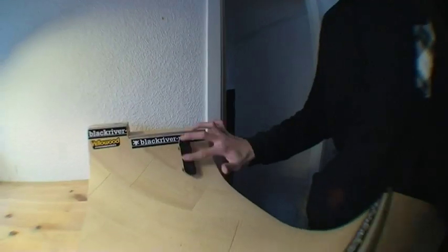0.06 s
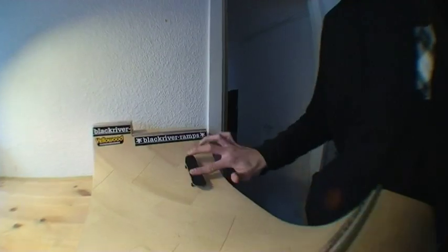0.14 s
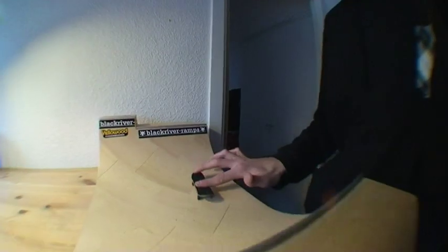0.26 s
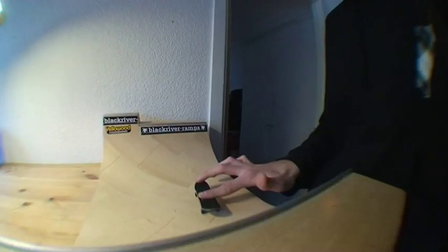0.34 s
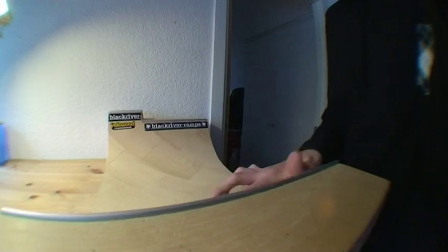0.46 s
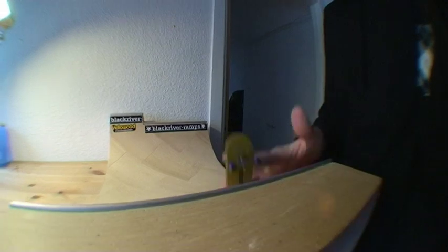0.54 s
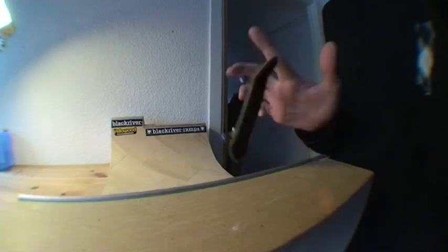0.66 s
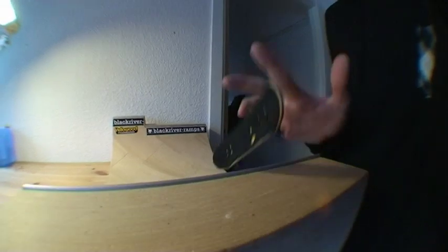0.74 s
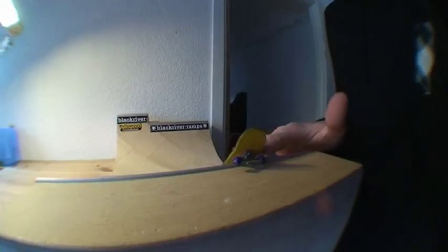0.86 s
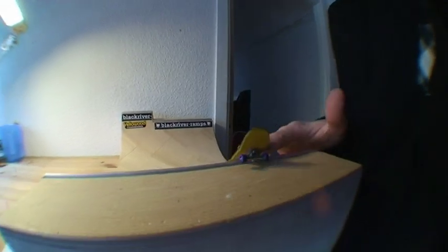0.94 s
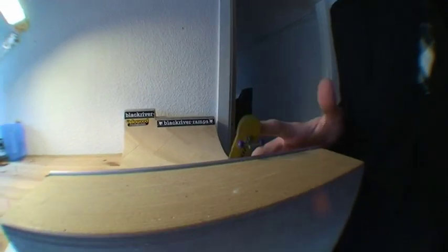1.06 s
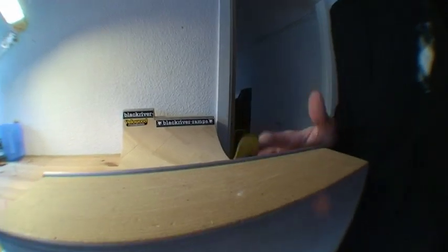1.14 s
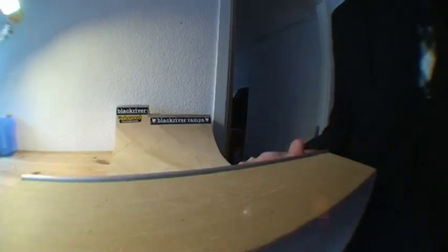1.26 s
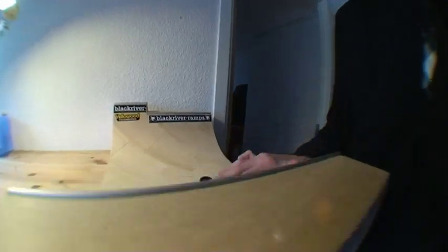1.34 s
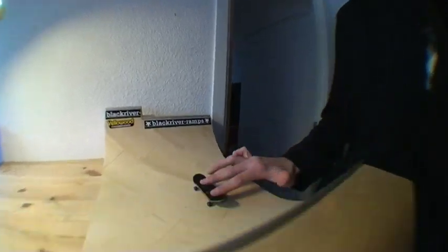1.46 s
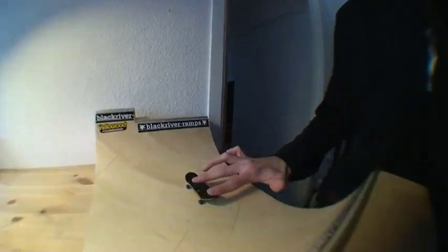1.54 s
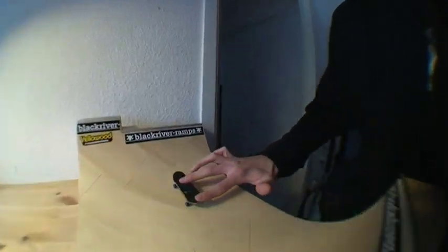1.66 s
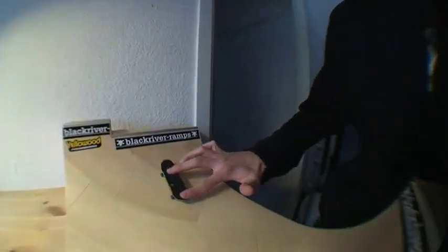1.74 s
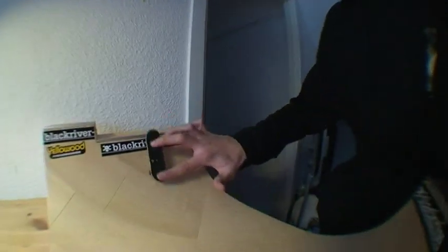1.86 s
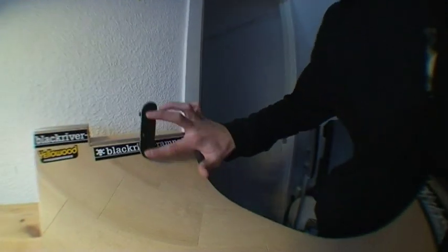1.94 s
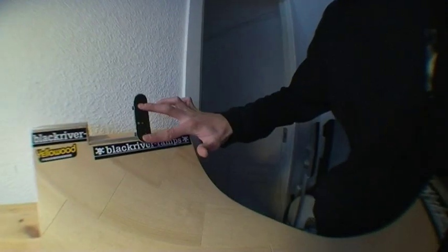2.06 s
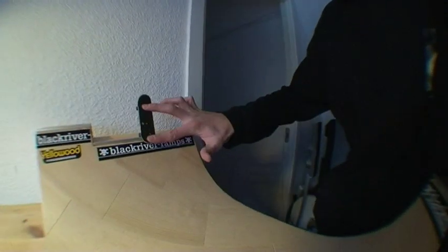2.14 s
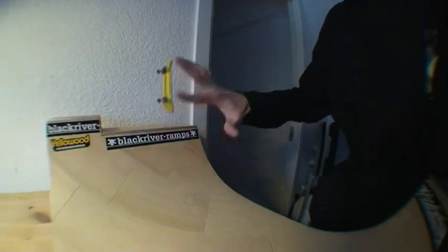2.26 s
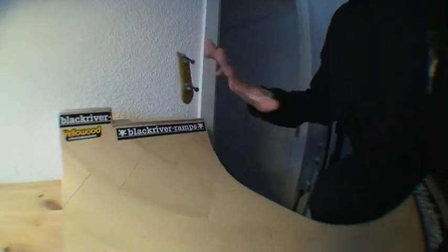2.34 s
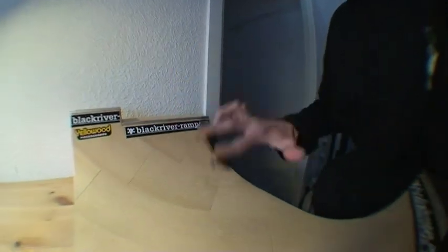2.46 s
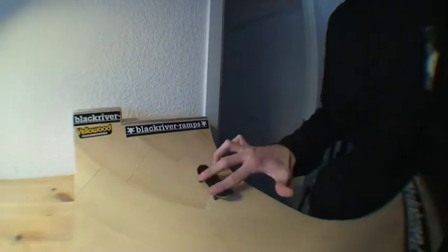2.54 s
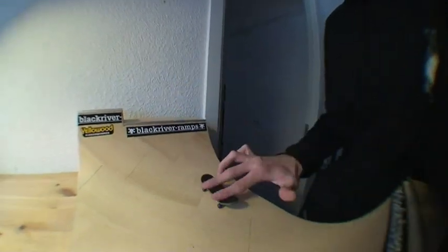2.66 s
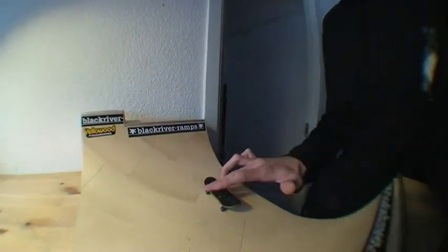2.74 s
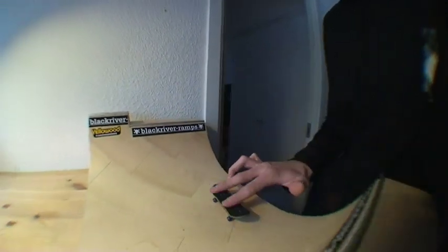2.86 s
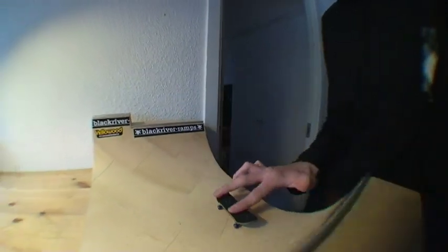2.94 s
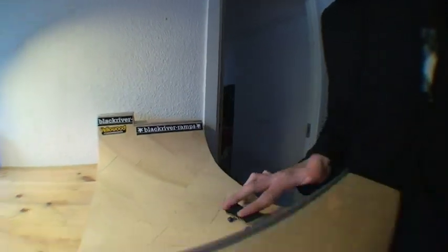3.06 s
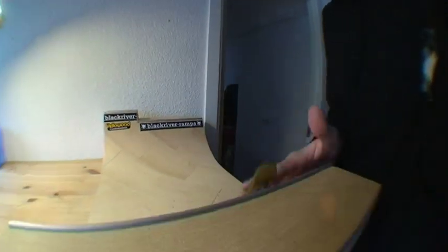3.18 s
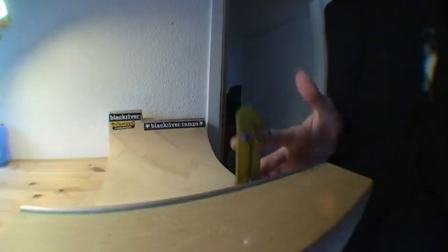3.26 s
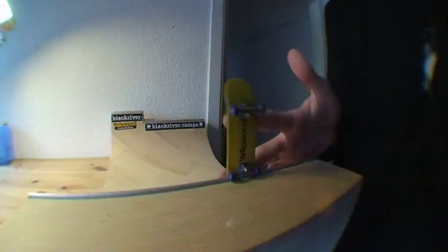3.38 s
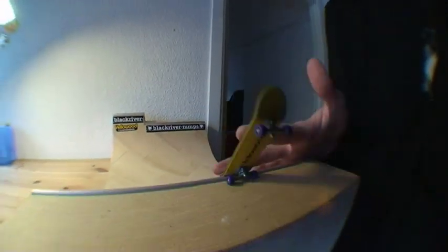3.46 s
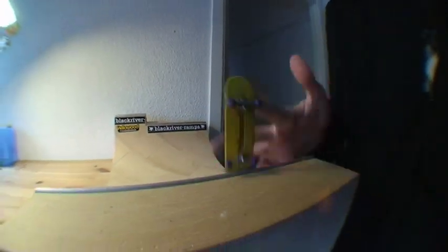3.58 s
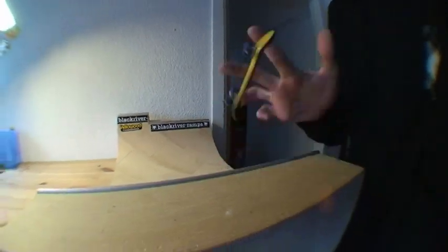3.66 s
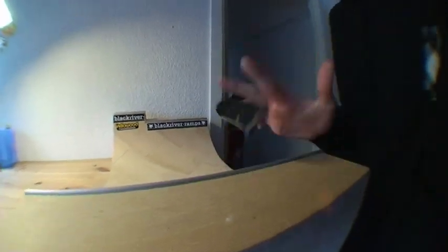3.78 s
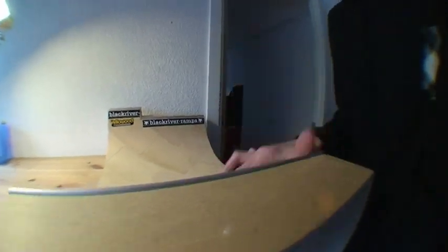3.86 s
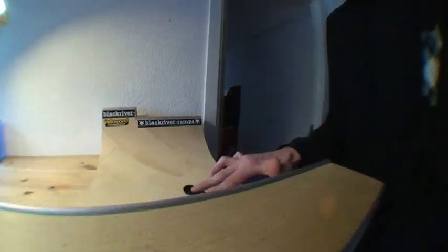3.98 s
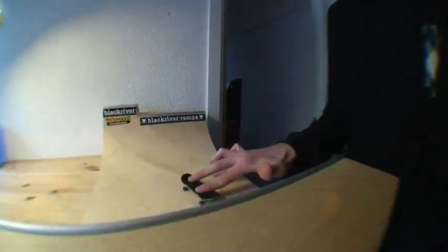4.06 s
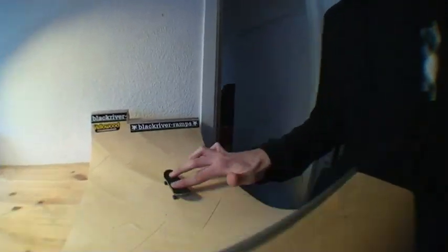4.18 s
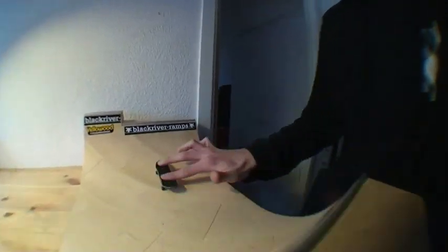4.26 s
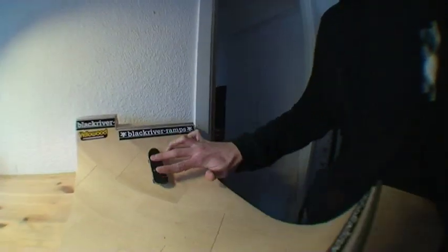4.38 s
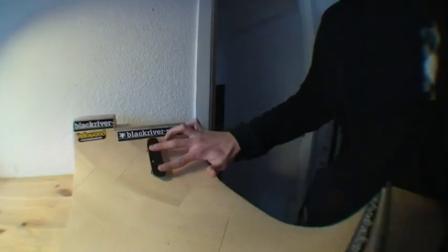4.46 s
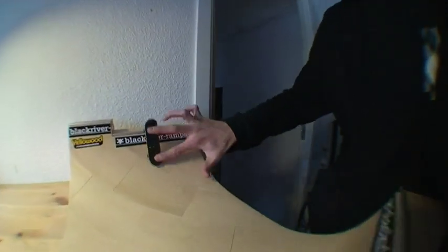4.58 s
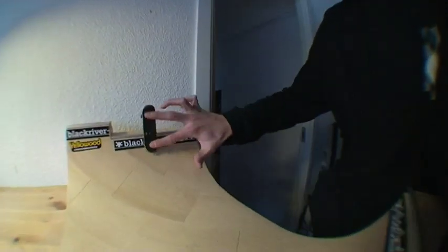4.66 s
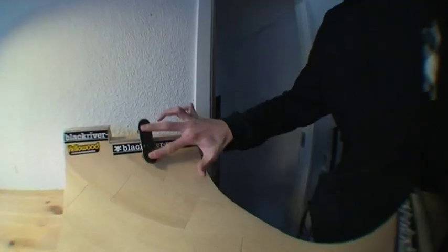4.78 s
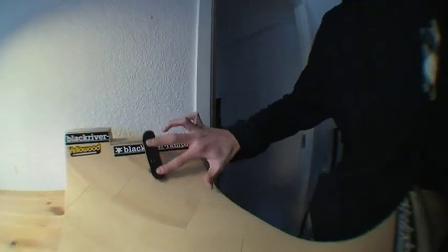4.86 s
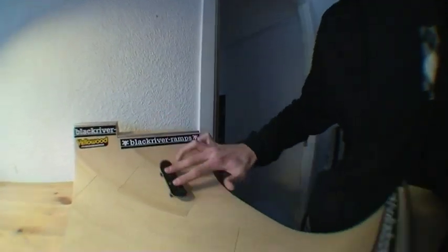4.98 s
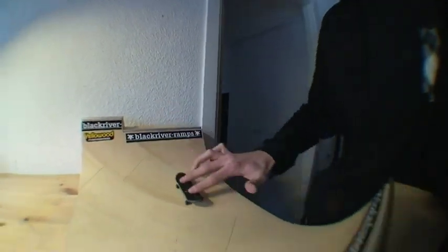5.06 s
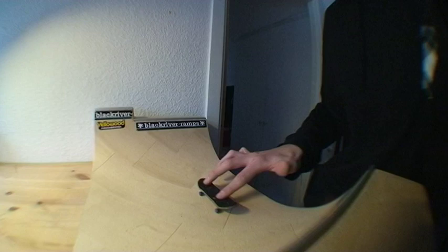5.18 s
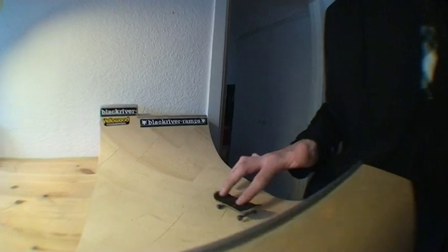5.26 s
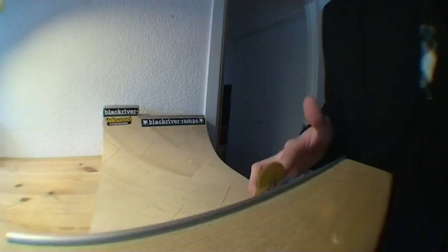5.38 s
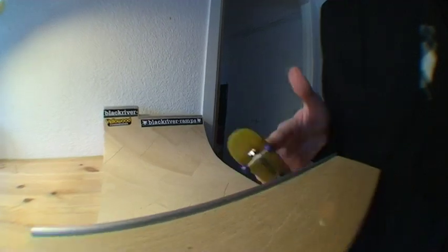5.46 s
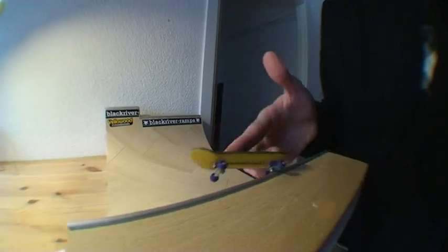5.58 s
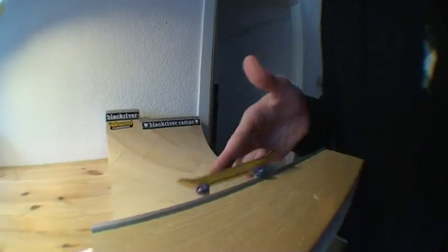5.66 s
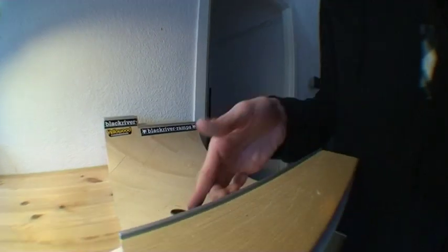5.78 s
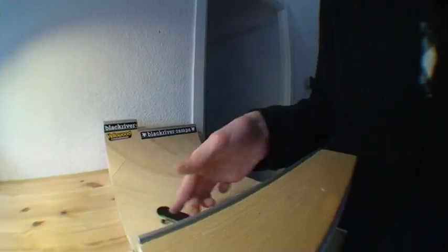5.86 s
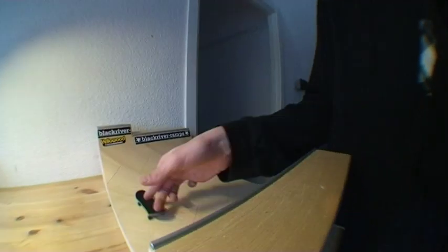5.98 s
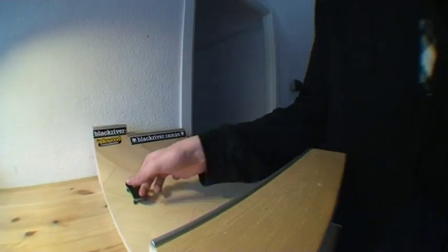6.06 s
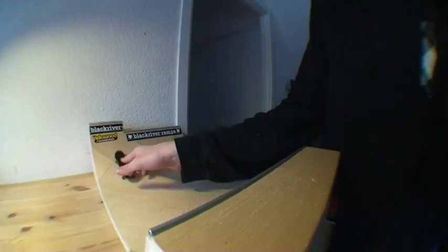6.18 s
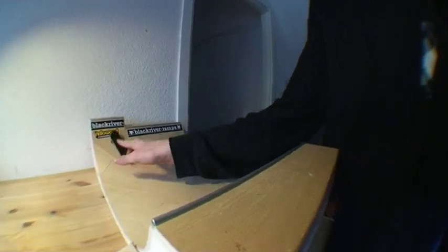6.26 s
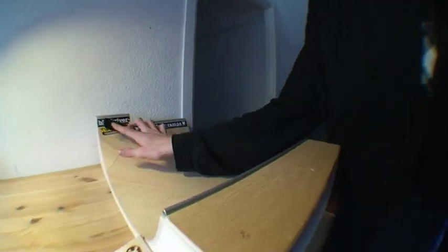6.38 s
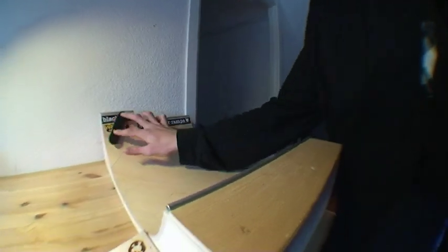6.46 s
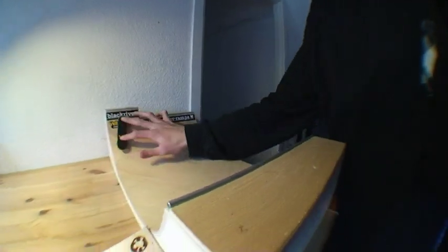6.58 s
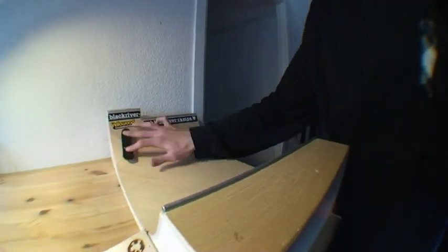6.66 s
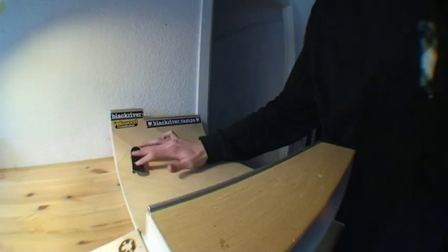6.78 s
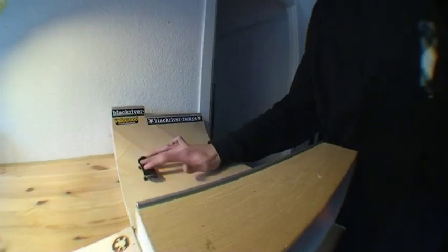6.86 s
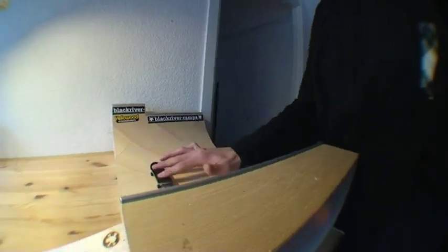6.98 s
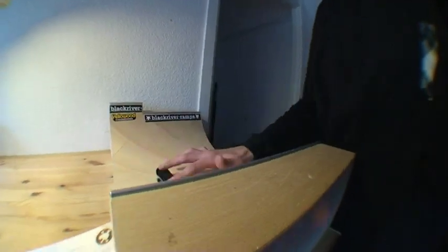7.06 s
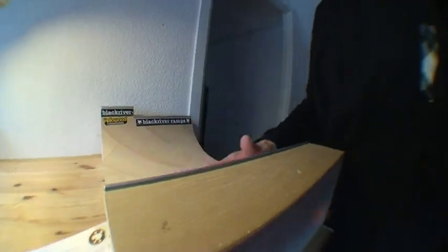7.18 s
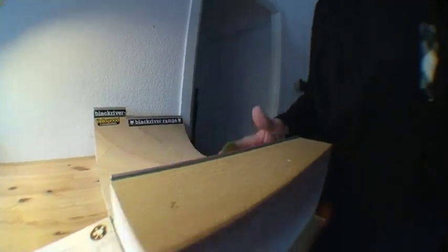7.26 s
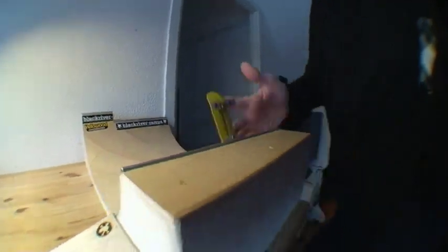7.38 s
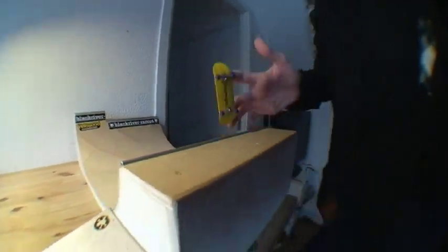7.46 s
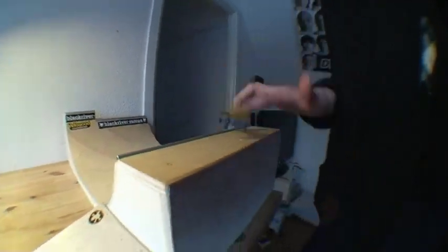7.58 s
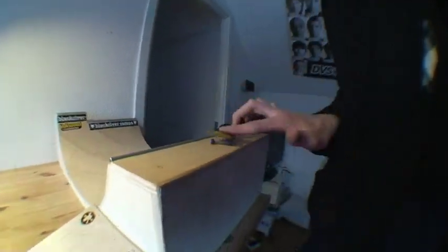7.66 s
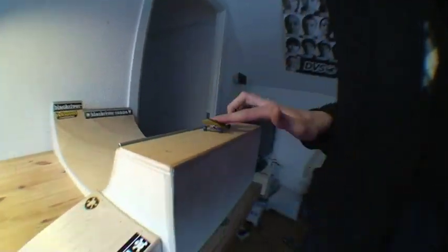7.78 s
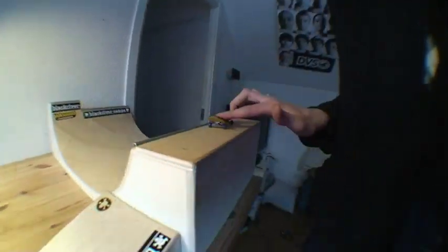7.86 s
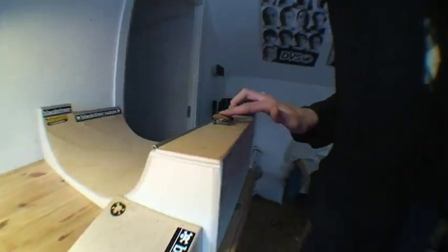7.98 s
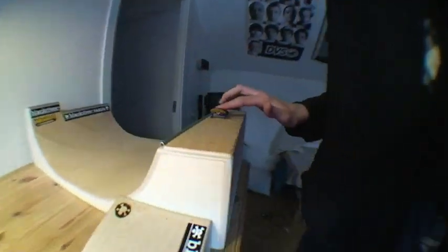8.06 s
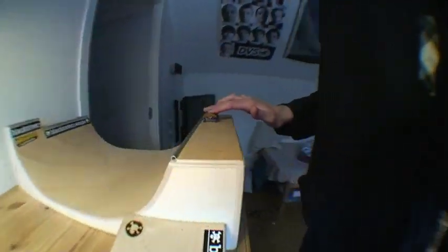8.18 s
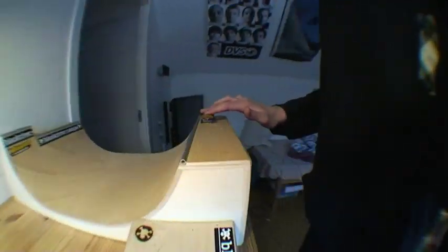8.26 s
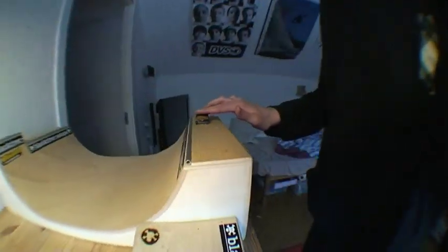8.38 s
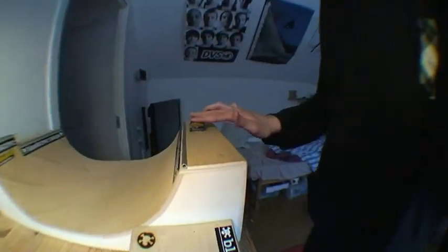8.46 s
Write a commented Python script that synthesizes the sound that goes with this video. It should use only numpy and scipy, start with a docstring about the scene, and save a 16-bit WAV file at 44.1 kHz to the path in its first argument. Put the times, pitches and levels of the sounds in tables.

```python
"""Hard little wheels of a toy finger skateboard rumble over a hollow plywood ramp on a desk, close to a camera.
Grain bumps and rubbing noise drive wandering ramp and deck resonances; the wheels add bright grit.
Pops, landings and knocks are chatters of contacts that ring ramp, deck and metal; axles tick, wheels skid
and a metal edge rings under a scrape. Close reflections and a small room answer, over grip rumble,
sleeve rustle, hiss and faint tones; sharp blows overload the microphone input."""
import sys
import numpy as np
from scipy import signal
from scipy.fft import rfft, irfft, next_fast_len
from scipy.io import wavfile

SR = 44100
rng = np.random.default_rng(int(sys.argv[2]) if len(sys.argv) > 2 else 0)


def how_loud(loudness_db):
    """Turn decibels into a plain amplitude multiplier (0 dB gives 1, 20 dB gives 10)."""
    steps = np.asarray(loudness_db, float) / 20
    return 10 ** steps


def file_out(sig):
    """Save sig as 16-bit WAV at sys.argv[1]."""
    # one column per channel
    cols = np.atleast_2d(sig).T
    # limit, then scale
    lim = np.clip(cols, -1, 1)
    pcm = np.round(lim * 32767).astype(np.int16)
    wavfile.write(sys.argv[1], SR, pcm)


N = 376173


def rms_one(x):
    """Scale to rms 1."""
    return x / np.sqrt(np.mean(x ** 2) + 1e-20)


def in_time(rows):
    """Table columns joined by lines over the first column (s), one value a sample."""
    time_s, *columns = np.transpose(rows)
    return np.array([np.interp(np.arange(N) / SR, time_s, column) for column in columns])


def band(x, low_hz, high_hz):
    """Band-pass."""
    sos = signal.butter(2, [low_hz, min(high_hz, .45 * SR)], "band", fs=SR, output="sos")
    return signal.sosfilt(sos, x)


def coloured(x, spectrum):
    """Give a flat signal the colour of a (Hz, dB) table, joined over log frequency."""
    size = next_fast_len(N)
    hz, level_db = np.transpose(spectrum)
    log_hz = np.log(np.arange(1, size // 2 + 2) * SR / size)
    gain = how_loud(np.interp(log_hz, np.log(hz), level_db))
    return irfft(rfft(x, size) * gain, size)[..., :N]


def drift(rate_hz):
    """Slow random curve of rms 1: noise at SR / 40 through a double pole."""
    r = np.exp(-80 * np.pi * rate_hz / SR)
    noise = rng.standard_normal(N // 40 + 2002)
    slow = signal.lfilter([1], [1, -2 * r, r * r], noise)[2000:]
    return np.interp(np.arange(N) / 40, np.arange(len(slow)), rms_one(slow))


def decay_per_sample(t60_s):
    """Pole radius that loses 60 dB in t60_s, at least 3 ms."""
    return how_loud(-60 / (max(t60_s, .003) * SR))


def ring(push, hz, t60_s):
    """Fixed resonance: a unit click sets a sine of height 1 ringing."""
    r, w = decay_per_sample(t60_s), 2 * np.pi * hz / SR
    return signal.lfilter([0, np.sin(w)], [1, -2 * r * np.cos(w), r * r], push + 1e-18)


def sliding(push, hz, t60_s):
    """Resonance of moving pitch: turn down to rest, smooth, turn back."""
    turn = np.exp(2j * np.pi * np.cumsum(hz) / SR)
    smooth = signal.lfilter([1], [1, -decay_per_sample(t60_s)], push / turn)
    return rms_one((smooth * turn).real)


# room hiss spectrum: pitch_hz, level_db_per_hz
AIR_SPECTRUM = [(30, -10), (520, -9), (700, -17), (5200, -28), (6300, -21), (8900, -28), (9600, -33),
                (16000, -39)]
# faint steady room tones: pitch_hz, rms_db
ROOM_TONES = [(516.8, -73.5), (1200, -82), (1927, -80), (2815, -81)]


def room_tone():
    """Coloured hiss, partly shared by the channels, with noise-driven narrow resonances that waver."""
    hiss_rms_db = -67
    noise = rng.standard_normal((3, N))
    hiss = rms_one(coloured(noise[0] + .5 * noise[1:], AIR_SPECTRUM))
    tones = sum(how_loud(rms_db) * rms_one(ring(noise[1], hz, t60_s=1.0)) for hz, rms_db in ROOM_TONES)
    return how_loud(hiss_rms_db) * hiss + tones


# sleeve rustle as the camera swings: time_s, level_db
RUSTLE_LEVEL = [(7.3, -76.5), (7.5, -62), (7.95, -62), (8.53, -51)]


def sleeve_rustle():
    """Cloth friction: mid-band noise of uneven level."""
    noise = rms_one(band(rng.standard_normal((2, N)), 220, 3200))
    return how_loud(in_time(RUSTLE_LEVEL)[0] + 5.2 * drift(32)) * noise


# the hand shifts on the camera: time_s, level_db
GRIP_LEVEL = [(5.85, -73), (6.15, -62), (6.5, -74), (6.9, -53.5), (7.2, -62), (7.5, -44), (7.9, -68),
              (8.05, -53.5), (8.3, -46), (8.53, -62)]


def grip():
    """Dull lumpy rumble through the camera body: low noise of uneven level."""
    noise = rms_one(band(rng.standard_normal((2, N)), 66, 300))
    return how_loud(in_time(GRIP_LEVEL)[0] + 7.2 * drift(18)) * noise


def room(x):
    """Dense reflections, unlike in the two channels: a low and a high noise tail, each with its own decay."""
    level_db, low_t60_s, high_t60_s, build_up_s = -12.5, 0.31, 0.39, 0.0036
    t = np.arange(SR // 2) / SR
    noise = rng.standard_normal((3, len(t)))
    tail = band(noise[0] + 0.49 * noise[1:], 51, 2600) * how_loud(-60 * t / low_t60_s)
    tail += band(noise[0] + 2.6 * noise[1:], 1200, 11000) * how_loud(-60 * t / high_t60_s - 15.5)
    tail = tail * np.minimum(t / build_up_s, 1)
    tail = tail / np.sqrt(np.sum(tail ** 2) / 2)
    return how_loud(level_db) * signal.fftconvolve(x[None], tail, axes=1)[:, :N]


def near(x):
    """Close reflections off desk and camera: opposite sign in the channels widens the treble."""
    level_db, fade_s = -15, .014
    t = np.arange(4096) / SR
    echo = band(rng.standard_normal(len(t)) * np.exp(-t / fade_s), 1200, 10500)
    return how_loud(level_db) * signal.fftconvolve(x, echo / np.linalg.norm(echo))[:N] * [[1], [-1]]


# ringing metal edge: pitch_hz, level_db (relative), t60_s
RAIL_MODES = [(3040, -12, 0.52), (3130, -1.5, 0.26), (3700, 7, 0.092)]


def rail():
    """The axle scrapes off the metal edge: noise-driven rough rings, each dying at its own rate."""
    start_s, level_db = 5.579, -34
    since_s = np.arange(N) / SR - start_s
    noise = rng.standard_normal(N)
    out = np.zeros(N)
    for hz, mode_db, t60_s in RAIL_MODES:
        fade = (since_s > 0) * how_loud(level_db + mode_db - 60 * np.abs(since_s) / t60_s)
        out += fade * rms_one(ring(noise, hz, t60_s=0.014))
    return out


# wheels skid up the slope: time_s, level_db, centre_hz
SKID_PATH = [(1.7, -77.5, 9880), (1.84, -37.5, 8800), (1.97, -46, 6600), (2.02, -80, 6040)]


def skid():
    """Narrow hiss with a falling centre: low noise times a sliding sine."""
    level_db, hz = in_time(SKID_PATH)
    noise = band(rng.standard_normal(N), 20, 650)
    return how_loud(level_db) * rms_one(noise * np.sin(2 * np.pi * np.cumsum(hz) / SR))


# loose axles and wheels tick: start_s, peak_db, pitch_hz
TICK_EVENTS = [(0.871, -14, 5400), (2.826, -24, 3580), (2.919, -26, 5030), (3.374, -24, 5000),
               (3.616, -35.5, 5250), (4.566, -12.5, 3460), (5.104, -21, 6500), (6.4565, -23.5, 4860),
               (6.553, -21, 5530), (6.634, -32, 5810), (6.649, -28, 5500), (8.4658, -30, 3660)]


def ticks():
    """Brief bright noise bursts, each in its own band; a random rattle follows the wheel grit."""
    t60_s, typical_rattles_per_s, rattle_over_grit_db = 0.019, 55, -13
    out, t = np.zeros(N), np.arange(1024) / SR
    for (start_s, peak_db, hz), noise in zip(TICK_EVENTS, rng.standard_normal((len(TICK_EVENTS), len(t)))):
        burst = band(noise * how_loud(-60 * t / t60_s), 0.5 * hz, 1.33 * hz)
        out[int(start_s * SR):][:len(t)] += how_loud(peak_db) * burst / np.abs(burst).max()

    met = rng.random(N) < typical_rattles_per_s * how_loud(5.0 * drift(4)) / SR
    met = met * how_loud(1.8 * np.minimum(rng.exponential(1, N), 3))
    dealt, noise = rng.integers(0, 6, N), rng.standard_normal(N)    # each rattle falls in one of six bands
    rattle = 0
    for k, hz in enumerate(np.geomspace(3000, 11000, 6)):
        fading = signal.lfilter([1], [1, -decay_per_sample(t60_s)], met * (dealt == k) + 1e-18)
        rattle = rattle + how_loud(-5 * k) * band(noise * fading, .8 * hz, 1.25 * hz)
    grit_db = ride()[1]
    return out + how_loud(grit_db + rattle_over_grit_db) * rms_one(rattle)


def input_overload():
    """Sharp blows overload the input, which clips unevenly: a one-sided low offset that settles slowly."""
    start_s, _, _, metal_drive_db, _ = np.transpose(BLOW_EVENTS)
    offsets = np.zeros(N)
    offsets[np.round(start_s * SR).astype(int)] = np.tanh(how_loud(metal_drive_db + 13.5) ** 2)  # saturates
    settle = signal.lfilter([1], [1, -np.exp(-1 / (0.053 * SR))], offsets)
    return how_loud(-31.5) * band(band(settle, 3.3, 50), 1.3, 60)


def struck(start_s, drive_db, chatter_ms, low_hz, high_hz, crack_db, modes=(), modes_db=0):
    """Each blow is a short chatter of contacts: a crack, plus modes with new strengths each time."""
    t = np.arange(4096) / SR
    count = len(start_s)
    chatter_s = np.clip(chatter_ms, .3, 25)[:, None] / 1000
    fade = np.exp(-(t / chatter_s) ** 0.78)
    chatter = fade * rng.standard_normal((count, len(t)))
    # chance shapes a blow but leaves its strength
    evened = np.linalg.norm(fade, axis=1) / np.linalg.norm(band(chatter, low_hz, high_hz), axis=1)
    evened = evened * np.sqrt(2 * (high_hz - low_hz) / SR)
    chatter = chatter * (how_loud(drive_db) * evened)[:, None]
    at = np.round(start_s * SR).astype(int)[:, None] + np.arange(len(t))

    def laid(rows):
        """Add one row per blow into the timeline."""
        return np.bincount(at.ravel(), rows.ravel(), N)

    out = how_loud(crack_db) * band(band(laid(chatter), low_hz, high_hz), .5 * low_hz, 2 * high_hz)
    softened = chatter / np.sqrt(chatter_s * SR)     # a longer chatter is many weaker contacts
    strengths = how_loud(2.5 * rng.standard_normal((count, len(modes))))
    for k, (hz, mode_db, t60_s) in enumerate(modes):
        out += ring(laid(softened * strengths[:, [k]]) * how_loud(mode_db + modes_db), hz, t60_s)
    return out


# blows: start_s, deck_drive_db, ramp_drive_db, metal_drive_db, chatter_ms
BLOW_EVENTS = [(0.1118, -2.5, -5, -14, 2.8), (0.83, -3, -29, -23, 2.5), (0.8486, -3.5, -21, -14.5, 2.4),
               (0.8781, -7, -17, -15.5, 4.9), (1.0597, -38, -40, -51, 5.6), (1.092, -32, -36, -51, 12),
               (1.2077, -9, -28, -19, 4.2), (1.9873, -14.5, -12, -32, 4.2),
               (2.0315, -17.5, -15, -19.5, 9.4), (2.0813, -5.5, -14, -17, 5.8), (2.5594, -6, -7, -20, 16.4),
               (2.567, -14, -8.5, -18, 21.4), (3.36, -62, -27, -21, 4.8), (3.438, -19, -61, -18, 3.7),
               (3.447, -4.5, -22.5, -17, 1.26), (3.4884, -35, -29, -35, 7.3), (3.68, -83, -37, -50, 2),
               (3.881, -14, -16.5, -8.5, 1.65), (3.903, -7.5, -23, -28, 8.2), (3.914, -6, -18.5, -25, 16.6),
               (4.3744, -9, -11.5, -25.5, 2.2), (4.5212, -17.5, -21, -26, 1.1),
               (4.784, -1.5, -20.5, -14, 1.5), (4.7994, -12, -28, -20.5, 3.1), (4.958, -3, -42, -18, 3.1),
               (5.5513, -44, -49, -17, 3.8), (5.5789, -13.5, -57, -19, 2.9), (5.743, -23, -30, -26.5, 9),
               (5.777, -8.5, -20, -60, 3.9), (6.5328, -7.5, -18, -24, 2.7),  (7.6594, -7, -17.5, -19, 1),
               (7.6654, -5.5, -33, -16, 7), (7.674, -17, -29, -32, 34)]
# hollow ramp modes, also rung by rolling: pitch_hz, level_db (relative), t60_s
RAMP_MODES = [(332.3, 4, 0.18), (462.5, 10, 0.052), (663, 2, 0.11), (838, 1.5, 0.12), (1149, 2.5, 0.11)]
# thin deck modes, also rung by rolling: pitch_hz, level_db (relative), t60_s
DECK_MODES = [(1409, -8, 0.068), (1713, 3.5, 0.023), (2138, 1.5, 0.017), (2904, -10, 0.05),
              (4180, -17.5, 0.048)]


def blows():
    """Hollow ramp and thin deck ring; the metal parts give a shorter, dry tick."""
    start_s, deck_db, ramp_db, metal_db, chatter_ms = np.transpose(BLOW_EVENTS)
    ramp = struck(start_s, ramp_db, chatter_ms, 280, 1000, crack_db=10.0, modes=RAMP_MODES, modes_db=-19.0)
    deck = struck(start_s, deck_db, chatter_ms, 880, 3160, crack_db=3.0, modes=DECK_MODES, modes_db=-11.0)
    metal = struck(start_s, metal_db, 0.24 * chatter_ms, 3500, 8180, crack_db=13.0)
    return ramp + deck + metal


# wheels on the wood: contact_s, lift_s, contact_rumble_db, lift_rumble_db, grit_db (where rumble is -30 dB)
ROLL_STRETCHES = [(0.092, 0.592, -32, -30, -37), (1.25, 1.974, -36, -27, -40),
                  (2.652, 3.307, -38.5, -22.5, -39), (3.956, 4.006, -25.5, -36, -38.5),
                  (4.119, 4.691, -27.5, -26, -41.5), (4.78, 4.775, -35, -21, -44),
                  (4.918, 4.942, -30, -24.5, -43.5), (5.039, 5.521, -23.5, -23, -41.5),
                  (5.694, 5.89, -46, -52, -22), (5.913, 6.375, -31.5, -28, -32),
                  (6.435, 6.6, -38.5, -58, -31.5), (6.662, 7.394, -32.5, -26, -40.5),
                  (8.037, 8.34, -47.5, -42.5, -35), (8.512, 8.544, -38, -24.5, -32.5)]
# finger pressure changes: centre_s, width_s, rumble_gain_db, extra_grit_db
FINGER_PRESSES = [(0.295, 0.062, 8.5, -4), (0.501, 0.11, 6.5, 2.5), (1.26, 0.21, 4.5, 6.5),
                  (1.908, 0.29, 6.5, -3.5), (4.65, 0.028, 3, 6.5), (5.5, 0.012, -6, 15),
                  (6.19, 0.056, 5.5, -9), (6.825, 0.19, 6.5, 4), (7.249, 0.09, 4.5, 3)]
# touchdowns; the wheels are silent in the flight before: landing_s
FLIGHT_ENDS_S = [2.561, 3.9]


def ride():
    """Rumble and grit levels (dB): stretches swell, drift and die, powers add; presses shift both briefly."""
    settle_db_per_s, lift_db_per_s = 196, 387.5
    grit_db_per_rumble_db = 1.176
    t = np.arange(0, N + 64, 64) / SR
    rumble_power, grit_power = 1e-9, 1e-9
    pressed_db = np.zeros((2, len(t)))
    for centre_s, width_s, gain_db, extra_db in FINGER_PRESSES:
        swell = np.exp(-((t - centre_s) / width_s) ** 2)
        pressed_db += np.outer([gain_db, grit_db_per_rumble_db * gain_db + extra_db], swell)
    for contact_s, lift_s, contact_db, lift_db, grit_db in ROLL_STRETCHES:
        db = np.interp(t, [contact_s, lift_s], [contact_db, lift_db])
        db = db - settle_db_per_s * np.maximum(contact_s - t, 0) - lift_db_per_s * np.maximum(t - lift_s, 0)
        db[t < max([0] + [s for s in FLIGHT_ENDS_S if s < lift_s])] = -120
        rumble_power = rumble_power + how_loud(2 * db)
        grit_power = grit_power + how_loud(2 * (grit_db + grit_db_per_rumble_db * (db + 30)))
    levels_db = 10 * np.log10([rumble_power, grit_power]) + pressed_db
    return [np.interp(np.arange(N) / SR, t, level_db) for level_db in levels_db]


def bumps(typical_per_s, spread_db):
    """Wheels meet the grain of the wood: uneven clicks of either sign that come in clumps."""
    met = rng.random(N) < typical_per_s * how_loud(4.0 * drift(25)) / SR
    height = how_loud(spread_db * np.minimum(rng.exponential(1, N), 4))
    return rms_one(met * height * rng.choice([-1, 1], N))


def rolled(push, modes, low_hz, high_hz, modes_db, pivot_hz, focus_db, wander):
    """One body under the wheels: broad roar plus modes whose pitch wanders slowly at random.
    Modes are weighted by distance from pivot_hz: positive focus_db favours near ones, negative far ones."""
    roar = rms_one(band(push, low_hz, high_hz))
    tones, power = 0, 0
    for hz, mode_db, t60_s in modes:
        off_octaves = np.log2(hz / pivot_hz)
        gain = how_loud(mode_db + 6.4 * drift(5.5) - focus_db * off_octaves ** 2)
        tones = tones + gain * sliding(push, hz * (1 + wander * drift(2.75)), t60_s)
        power = power + gain ** 2
    return rms_one(roar + how_loud(modes_db) * tones / np.sqrt(power))


def wandering(x, patchy_db):
    """Changing wood and finger pressure: narrow bands swell and fade, each on its own."""
    out = x
    for hz in np.geomspace(1100, 12000, 11):
        out = out + (how_loud(patchy_db * drift(2.5)) - 1) * band(x, hz / 1.05, hz * 1.038)
    return out


# rolling colour: pitch_hz, level_db_per_hz
ROLL_SPECTRUM = [(50, -38.5), (200, -15.5), (315, -13.5), (880, 4), (3000, -5), (5000, -19), (6100, -17.5),
                 (7800, -28), (9000, -25), (13000, -47), (16000, -49.5)]
# pitch the ramp favours under the wheels, higher up the slopes: time_s, pitch_hz
FAVOURED_PITCH = [(0.2, 723), (1.23, 1110), (1.5, 707), (1.9, 1046), (2.9, 678), (3.35, 984), (4.05, 803),
                  (4.7, 1023), (5.05, 1034), (5.38, 700), (5.5, 970), (5.96, 796), (6.4, 1049), (6.65, 752),
                  (7.4, 1080)]


def rolling():
    """Grain bumps over a smoother rubbing noise drive ramp and deck; the wheels add a grit of their own."""
    rumble_db, grit_db = ride()
    buzz_db = 0.58 * rumble_db + 0.67 * grit_db + 6.0      # the deck feels both the ramp and the wheels
    hz = in_time(FAVOURED_PITCH)[0]
    rub = rng.standard_normal(N) * how_loud(2.76 * drift(30))
    push = coloured(rub + how_loud(-3.5) * bumps(900, spread_db=-2.0), ROLL_SPECTRUM)
    grit = coloured(rng.standard_normal(N) * how_loud(3.1 * drift(42)), ROLL_SPECTRUM)
    grit = rms_one(band(grit, 3530, 21000))
    favoured_mode = (hz, 19.0 + 0.62 * rumble_db, .04)     # stands out more as the rumble grows
    ramp = rolled(push, RAMP_MODES + [favoured_mode], 81, 718,
                  modes_db=-0.5, pivot_hz=hz, focus_db=8.0, wander=0.035)
    deck = rolled(push, DECK_MODES, 1200, 2800,
                  modes_db=0.0, pivot_hz=2 * hz, focus_db=-4.0, wander=0.045)
    # neighbouring bands alternate in sign so that they join without a gap
    mixed = how_loud(rumble_db) * ramp - how_loud(buzz_db) * deck + how_loud(grit_db) * grit
    return wandering(mixed, patchy_db=2.0)


# the board as the camera moves round: time_s, left_minus_right_db, hollow_tone_db
BOARD_PLACE = [(0, -1.5, 0.5), (5.5, -0.9, -1.5), (6.1, 1, -5.5), (8.53, 0.2, 3)]


def scene():
    """Board placed between the channels, its hollow tone varying with the view, plus room and handling."""
    side_db, hollow_db = in_time(BOARD_PLACE)
    board = rolling() + skid() + blows() + ticks() + rail()
    board = board + (how_loud(hollow_db) - 1) * band(board, 240, 625)
    placed = board * how_loud(side_db * [[.5], [-.5]])
    return placed + near(board) + room(board) + input_overload() + grip() + sleeve_rustle() + room_tone()


def band_limit(x):
    """A steep low-pass at the top of the band."""
    return signal.sosfilt(signal.butter(12, 16750, fs=SR, output="sos"), x)


def record(dry):
    """The preamp rounds peaks towards a ceiling; a steep low-pass cuts the top."""
    ceiling, stop_hz = .72, 1.02 * 16750
    rounded = ceiling * np.tanh(dry / ceiling)
    cut = signal.sosfilt(signal.cheby2(10, 60, stop_hz, fs=SR, output="sos"), rounded)
    return band_limit(cut)


dry = scene()
out = record(dry)
file_out(out)
```